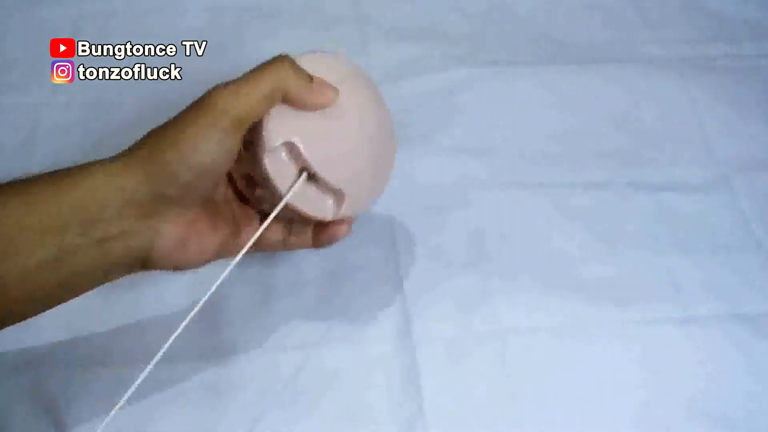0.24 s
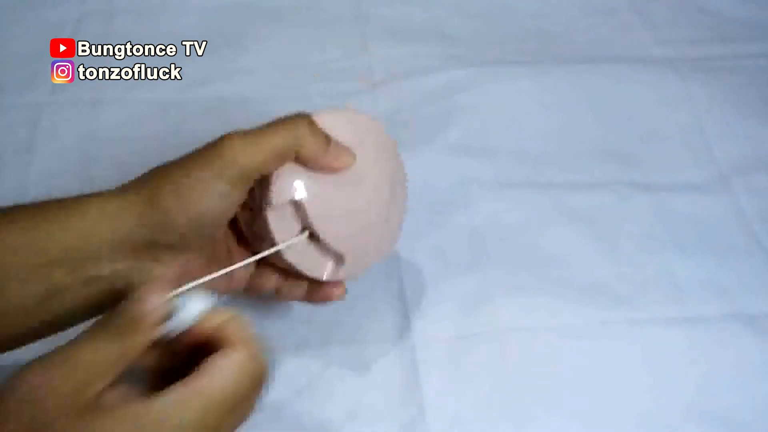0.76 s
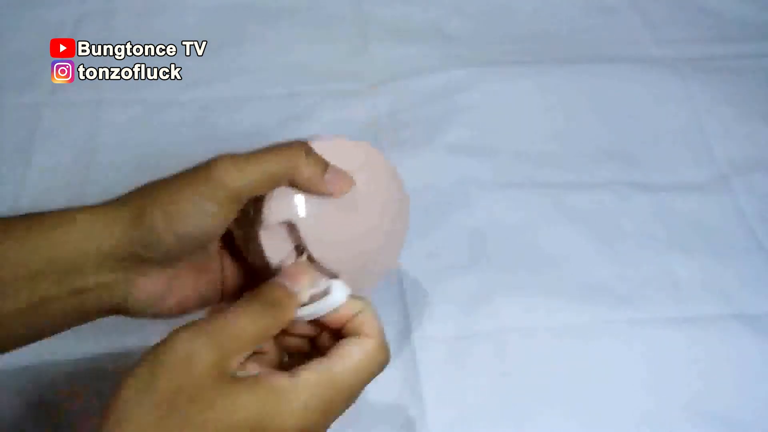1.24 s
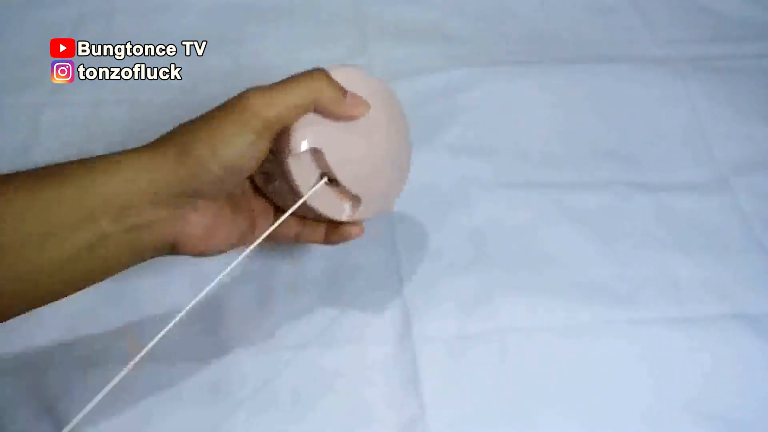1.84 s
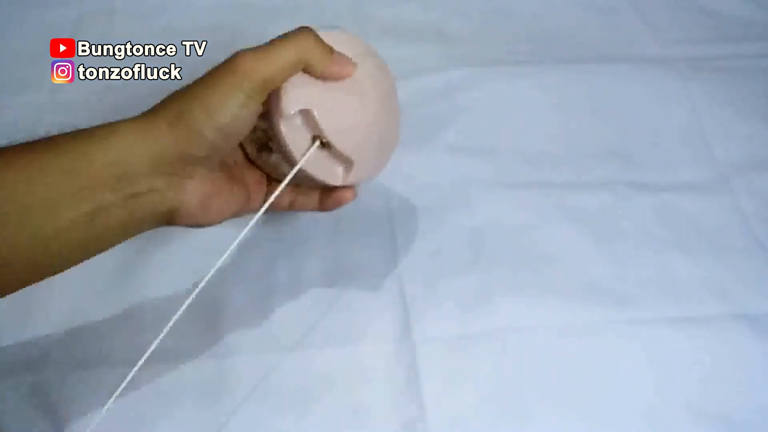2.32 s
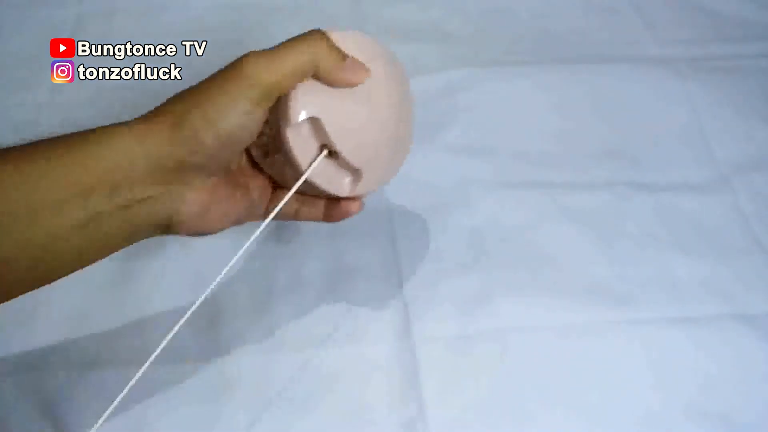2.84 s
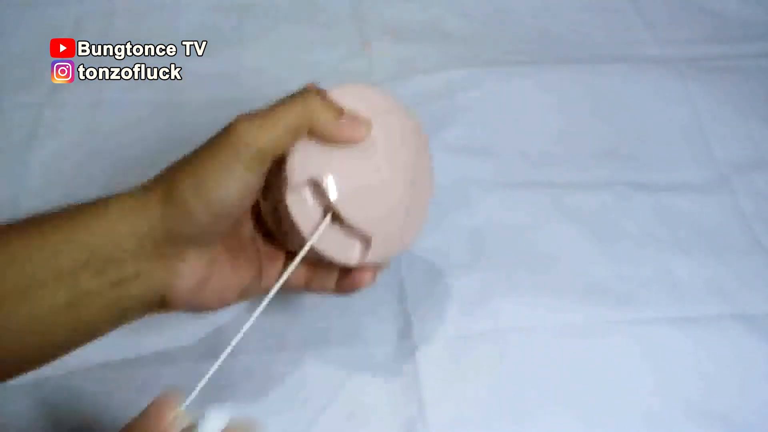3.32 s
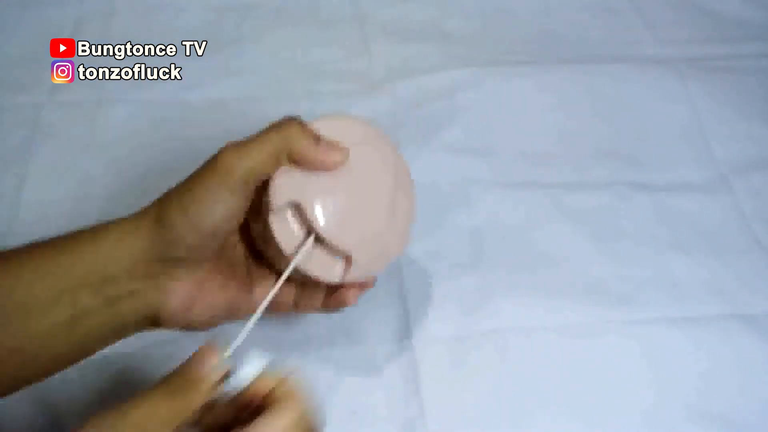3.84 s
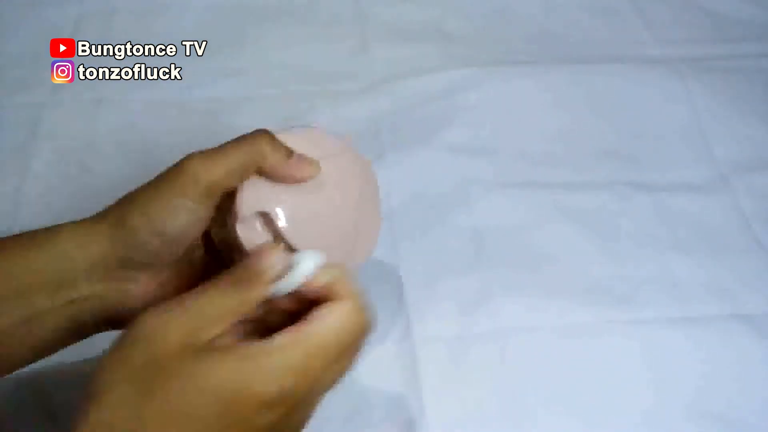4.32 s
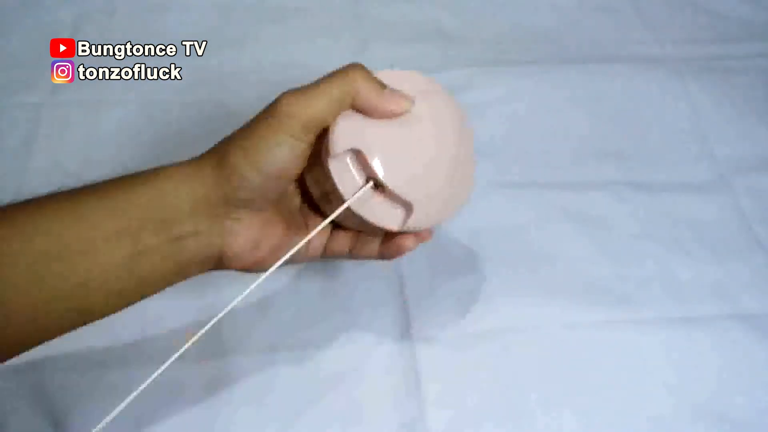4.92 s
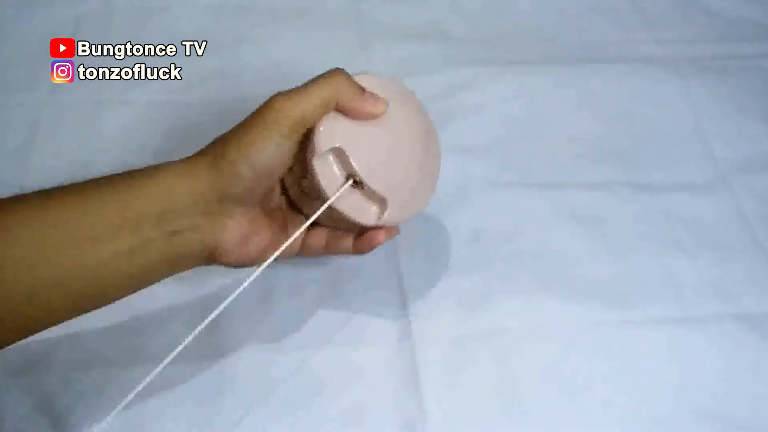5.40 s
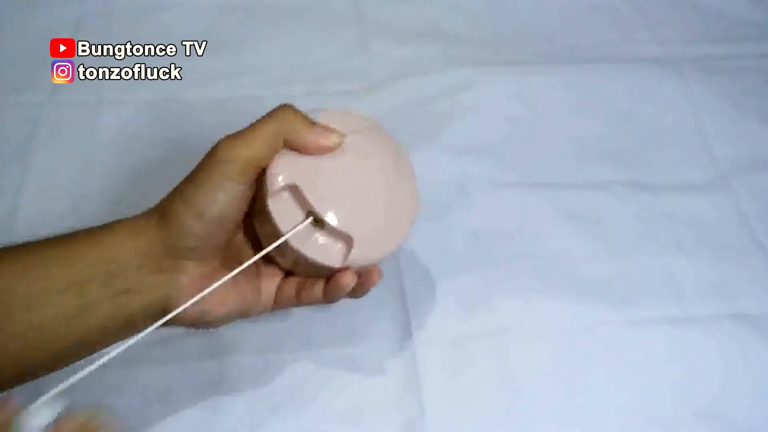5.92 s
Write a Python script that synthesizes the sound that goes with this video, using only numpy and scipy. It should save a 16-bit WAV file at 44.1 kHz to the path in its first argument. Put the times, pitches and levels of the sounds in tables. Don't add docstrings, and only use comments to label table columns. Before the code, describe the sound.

Quick, uneven mechanical strokes: a buzzing, hissing cord rewind, a tiny lull, a sharp tick as the slack ends, then a loud plastic thunk with clacks and clicks tumbling after it. About fourteen pulls occur without a long pause, all dry and close to a phone microphone. Faint low room air lies underneath, and nearby walls and table give only a brief, dull reflection.

```python
import sys
import numpy as np
from scipy import signal
from scipy.fft import rfft, irfft
from scipy.io import wavfile
from scipy.ndimage import uniform_filter1d

SR = 44100
rng = np.random.default_rng(int(sys.argv[2]) if len(sys.argv) > 2 else 0)


def ratio_of_db(decibels):
    return 10 ** (np.asarray(decibels, float) / 20)


def bounce(signal):
    frames = np.transpose(np.atleast_2d(signal))
    limited = np.clip(frames, -1, 1)
    pcm = np.round(limited * 32767).astype(np.int16)
    wavfile.write(sys.argv[1], SR, pcm)


N = 271656


def rms_one(x):
    return x / np.sqrt(np.mean(x ** 2) + 1e-20)


def drift(rate_hz):
    r = np.exp(-2 * np.pi * rate_hz / SR)
    noise = rng.standard_normal(N + SR)
    return rms_one(signal.lfilter([1], [1, -2 * r, r * r], noise)[SR:])


def resonate(x, hz, width):
    r = np.exp(-np.pi * width / SR)
    zeros = np.array([1, 0, -1]) * (1 - r * r) / 2
    poles = [1, -2 * r * np.cos(2 * np.pi * hz / SR), r * r]
    return signal.lfilter(zeros, poles, x)


def body(x, modes):
    return sum((-1) ** k * ratio_of_db(db) * resonate(x, hz, width) for k, (hz, width, db) in enumerate(modes))


def colour(x, spectrum, size=4096):
    hz, db = np.transpose(spectrum)
    grid = np.arange(1, size // 2 + 2) * SR / size
    cepstrum = irfft(np.log(ratio_of_db(np.interp(np.log(grid), np.log(hz), db))))
    cepstrum[1:size // 2] *= 2
    cepstrum[size // 2 + 1:] = 0
    response = irfft(np.exp(rfft(cepstrum)))
    return signal.fftconvolve(x, response / np.linalg.norm(response))[:N]


def along(tables, column):
    t = np.arange(N) / SR
    gain = np.zeros(N)
    for rows in tables:
        rows = np.array(rows)
        gain += ratio_of_db(np.interp(t, rows[:, 0], rows[:, column], left=-99, right=-99))
    return uniform_filter1d(gain, size=88)


# (start [s], spin-up [s], steady [s], ratchet at full speed [dB], as the hand lets up [dB])
RETURNS = [(-0.05, 0.054, 0.035, -28.5, -32.5), (0.351, 0.032, 0.074, -31.5, -34.5),
           (0.780, .044, 0.076, -27.5, -33.5), (1.212, 0.041, 0.062, -30, -30.5),
           (1.640, 0.048, 0.054, -27.5, -31.5), (2.069, 0.049, 0.042, -29, -31.5),
           (2.500, 0.027, 0.07, -32, -30.5), (2.960, .05, 0.043, -30, -31.5),
           (3.390, 0.035, 0.073, -32, -30.5), (3.840, 0.058, 0.053, -26, -27.5),
           (4.295, .035, .066, -33, -29.5), (4.729, 0.046, 0.077, -28, -36),
           (5.160, 0.027, 0.089, -28, -34), (5.581, 0.036, 0.07, -30.5, -29.5),
           (6.020, 0.072, 0.029, -28, -30.5)]
# (time [s], peak level [dB])
SNAPS = [(0.074, -17.5), (0.531, -18), (0.979, -20.5), (1.396, -22), (1.845, -14.5), (2.273, -12.5),
         (2.716, -24), (3.146, -35), (3.574, -15), (4.080, -15.5), (4.519, -20.5), (4.899, -13),
         (5.366, -40), (5.782, -17)]


def reeling():
    ratchet_start_db, ratchet_coast = -42, 200
    spool_start_db, spool_db, spool_coast = -40, -4.0, 191
    stops = [snap[0] for snap in SNAPS] + [N / SR]
    tables = []
    for (start, spin, steady, full_db, late_db), stop in zip(RETURNS, stops):
        let_up = start + spin + steady
        coast_s = stop - let_up
        tables.append([(start, ratchet_start_db, spool_start_db),
                       (start + spin, full_db, full_db + spool_db),
                       (let_up, late_db, late_db + spool_db),
                       (stop, late_db - ratchet_coast * coast_s, late_db + spool_db - spool_coast * coast_s)])
    return tables


# (frequency [Hz], level [dB per Hz])
REEL_SPECTRUM = [(1180, -39), (2000, -9), (2740, -12), (4010, -11), (5680, 0), (6640, -19), (9010, -21),
                 (12400, -32), (13900, -30), (16000, -43)]
# (frequency [Hz], level [dB per Hz])
SPOOL_SPECTRUM = [(59, -42), (100, -47.5), (308, -13), (427, -15), (733, -4), (934, -2), (3000, -19.5),
                  (3900, -43), (6600, -120)]
# (frequency [Hz], width [Hz], level [dB])
PAWL_MODES = [(4400, 75, 1.5), (5160, 130, 7), (5595, 105, 7), (8960, 1300, -56)]
# (frequency [Hz], width [Hz], level [dB])
SHELL_MODES = [(318, 96, -5.5), (542, 316, -3), (754, 34, 0), (1180, 54, 8.5), (1500, 63, -2)]


def ratchet():
    teeth_per_s = 175
    tables = reeling()
    level = along(tables, column=1)
    speed = np.clip(level / ratio_of_db(-28), 0, 1) ** .3
    teeth = np.cumsum(teeth_per_s * speed * ratio_of_db(1.5 * drift(40)) / SR)
    tooth_db = 2.5 * rng.standard_normal(N // 50)[teeth.astype(int)]
    skip = .14 + speed * ratio_of_db(tooth_db) * np.exp(-4 * (teeth % 1))
    scrape = skip * rng.standard_normal(N)
    cord = scrape + .24 * rng.standard_normal(N)
    bright = rms_one(colour(cord, REEL_SPECTRUM) + 1.7 * body(scrape, PAWL_MODES))
    wobble = rng.standard_normal(N) * ratio_of_db(3.85 * drift(145)) * (2.5 + skip)
    dull = rms_one(colour(wobble, SPOOL_SPECTRUM) + 0.19 * body(wobble, SHELL_MODES))
    return ratio_of_db(1.08) * level * bright + ratio_of_db(3.5) * along(tables, column=2) * dull


# (frequency [Hz], level [dB per Hz])
AIR_SPECTRUM = [(25, -14), (60, 9.5), (200, -1.5), (1200, -15), (5500, -14), (8000, -42), (16000, -43)]


def room_air():
    return ratio_of_db(-59) * colour(rng.standard_normal(N), AIR_SPECTRUM)


# (time [s], shell level [dB], shell pitch [Hz], bowl level [dB], gears level [dB])
BITES = [(0.152, -11.5, 1400, -2.5, -6), (0.557, -9.5, 1140, -23, -6), (1.004, -10.5, 830, -12.5, -8.5),
         (1.423, -8.5, 774, -29, -11.5), (1.865, -7, 1500, -22, -6.5), (2.295, -6.5, 1010, -5.5, -10),
         (2.762, -7, 1340, -8.5, -5), (3.180, -6.5, 1400, -8, -8), (3.698, -9, 1350, -11, -18),
         (4.101, -5.5, 1400, -22, -10.5), (4.545, -7, 878, -16, -5), (4.966, -5, 1360, -13, -3),
         (5.379, -6, 1420, -9, -5.5), (5.806, -5.5, 1256, -12.5, -4.5)]
# (stir before the bite [s], stir knock [dB], fastest after the bite [s], rumble then [dB])
PULLS = [(.022, -19, 0.076, -30.5), (.005, -22, 0.14, -31), (0.0065, -26, 0.13, -30),
         (.008, -24, 0.11, -29), (0.0045, -28, 0.079, -29.5), (0.0041, -28, 0.064, -27.5),
         (.020, -20, 0.12, -31.5), (0.0094, -22.5, 0.051, -30.5), (.016, -13, 0.035, -27),
         (.009, -23, 0.11, -27), (0.0045, -24, 0.056, -27), (0.03, -19.5, 0.12, -30),
         (0.0054, -24, 0.12, -29), (.005, -28, 0.087, -30)]


def pulling():
    slack_db, rub_fade_db = -37, 0.5
    stir_db, spent_db = -29.5, -40
    tables = []
    for snap, bite, pull, back in zip(SNAPS, BITES, PULLS, RETURNS[1:]):
        early, _, later, fastest_db = pull
        stir = bite[0] - early
        tables.append([(snap[0], slack_db), (stir, slack_db - rub_fade_db)])
        tables.append([(stir, stir_db), (bite[0] + later, fastest_db), (back[0], spent_db)])
    return tables


def grains(per_s, spread_db):
    sizes = ratio_of_db(spread_db * np.minimum(rng.exponential(1, N), 4)) * rng.choice([-1, 1], N)
    return rms_one(sizes * (rng.random(N) < per_s / SR))


def chatter_on_part():
    return (grains(1500, 4.1) + 0.57 * rng.standard_normal(N)) * ratio_of_db(2.6 * drift(82))


# (frequency [Hz], level [dB per Hz])
RUMBLE_SPECTRUM = [(18, -56), (30, -28), (426, -6), (760, 0.5), (1910, -5), (2480, -5), (2750, -11),
                   (5450, -11.5), (14000, -59), (16000, -49)]
# (frequency [Hz], width [Hz], level [dB])
BOWL_MODES = [(2216, 101, -2), (2462, 142, 1), (3350, 204, -13)]


def rotor():
    shell, bowl, gears = [chatter_on_part() for part in range(3)]
    sound = colour(gears + 0.55 * shell, RUMBLE_SPECTRUM)
    sound = sound + 3 * body(shell, SHELL_MODES) + 0.69 * resonate(gears, 3060, 590)
    sound = sound + 1.6 * body(bowl, BOWL_MODES) + .8 * resonate(bowl, 2350, 600)
    return ratio_of_db(2.5) * along(pulling(), column=1) * rms_one(sound)


def cord_snaps():
    thuds = [(s, db, 1240) for s, db in SNAPS]
    clacks = [(s, db - 31) for s, db in SNAPS]
    ticks = [(s, db - 6.5, 5440) for s, db in SNAPS]
    return thuds, clacks, ticks


# (time [s], shell level [dB], shell pitch [Hz], bowl level [dB])
TURNS = [(0.092, -15, 1600, -24), (0.196, -10.5, 685, -22), (0.220, -13, 1180, -16),
         (0.662, -12.5, 1070, -19), (0.706, -13, 1120, -16), (1.059, -13, 756, -17),
         (1.101, -16, 1520, -15), (1.138, -13, 1130, -18.5), (1.438, -14.5, 1050, -32),
         (1.487, -13, 1420, -26), (1.527, -15.5, 1380, -12.5), (1.912, -13.5, 1100, -9.5),
         (1.960, -14.5, 670, -24), (2.004, -14, 1190, -12.5), (2.386, -15.5, 1170, -19),
         (2.427, -12, 1330, -27), (2.840, -10, 564, -14), (2.884, -11.5, 1275, -7.5),
         (3.217, -12, 1230, -33), (3.256, -10.5, 1030, -28), (3.730, -16, 730, -10),
         (4.184, -9.5, 1310, -9), (4.665, -14, 1180, -23), (5.013, -13, 900, -14), (5.422, -13, 1300, -28),
         (5.454, -12, 1280, -24), (5.823, -17, 830, -19), (5.846, -9.5, 1180, -16),
         (5.887, -15, 1070, -9.5), (5.924, -13, 1340, -22.5)]


def rotor_turns():
    thuds = [(s, db, hz) for s, db, hz, _ in TURNS]
    clacks = [(s + .003, bowl_db) for s, *_, bowl_db in TURNS]
    return thuds, clacks, []


# (time [s], peak level [dB], pitch [Hz])
TICKS = [(0.093, -15.5, 5300), (0.600, -12.5, 3350), (0.692, -17, 3500), (0.735, -22, 3590),
         (1.106, -10, 3350), (1.453, -19, 3450), (1.503, -21, 3360), (1.530, -21, 4000),
         (1.581, -14.5, 3400), (1.961, -18, 4840), (2.038, -22, 3370), (2.350, -20.5, 5400),
         (2.388, -16, 5300), (2.841, -18, 4700), (2.884, -14.5, 3190), (3.259, -19.5, 4400),
         (3.605, -19.5, 3480), (3.720, -14.5, 4040), (3.734, -18, 3300), (3.764, -16, 3400),
         (4.199, -17, 3280), (4.623, -17.5, 5260), (4.652, -16.5, 3350), (5.055, -10.5, 3320),
         (5.092, -11.5, 3320), (5.465, -9.5, 3400), (5.495, -15, 3390), (5.863, -15, 3550),
         (5.874, -13.5, 4150), (5.918, -14, 3430)]


def gear_ticks():
    return [], [], TICKS


def rotor_stirs():
    stirs = [(bite[0] - pull[0], pull[1]) for bite, pull in zip(BITES, PULLS)]
    return [(s, db, 1050) for s, db in stirs], [(s, db - 2) for s, db in stirs], []


BITE_GEARS = [3400, 5700, 5400, 3470, 3480, 5800, 3500, 4950, 3320, 4700, 5300, 4620, 5170, 3580]


def clutch_bites():
    thuds = [(s, db, hz) for s, db, hz, *_ in BITES]
    rebounds = [(s + .008, db - 9.5, 730) for s, db, *_ in BITES]
    clacks = [(s + .003, bowl_db) for s, *_, bowl_db, _ in BITES]
    ticks = [(s + .0015, gears_db, hz) for (s, *_, gears_db), hz in zip(BITES, BITE_GEARS)]
    return thuds + rebounds, clacks, ticks


# (time [s], peak level [dB])
CLACKS = [(0.572, -11), (0.587, -13), (0.599, -6), (0.629, -14), (0.679, -12.5), (0.733, -13), (1.033, -16),
          (1.089, -9), (1.451, -6), (1.503, -15), (1.551, -15), (1.569, -12), (2.325, -14), (2.450, -11.5),
          (2.864, -19), (3.274, -15), (3.604, -9), (3.639, -12), (3.681, -11), (3.692, -8), (4.113, -14),
          (4.164, -8), (4.206, -6.5), (4.223, -10), (4.629, -15), (4.977, -5.5), (5.054, -6), (5.090, -8),
          (5.106, -10), (5.950, -13)]


def hub_clacks():
    count, span_s = 5, 0.16
    loudest_db, fade_db, spread_db = -19, 1.5, -1
    chatter = []
    for bite, row in zip(BITES, rng.random((len(BITES), count, 2))):
        for when, size in row:
            chatter.append((bite[0] + span_s * when, loudest_db - fade_db * when + spread_db * (2 * size - 1)))
    return [], CLACKS + chatter, []


def hits(events, contact_s, sound, size=1800):
    out = np.zeros(N + size)
    t = np.arange(size) / SR
    for (s, peak_db, *pitch), rough in zip(events, rng.standard_normal((len(events), size))):
        u = t / (contact_s * (1 + 0.5 * ratio_of_db(peak_db)))
        ring = sound(rough * u ** .25 * np.exp(-u), *pitch)
        out[round(s * SR):][:size] += ratio_of_db(peak_db) * ring / np.abs(ring).max()
    return out[:N]


def shell_ring(x, hz):
    return resonate(x, hz, 380) + .5 * body(x, SHELL_MODES)


def bowl_ring(x):
    return body(x, BOWL_MODES) + 0.56 * resonate(x, rng.uniform(2300, 2487), 187)


def gear_ring(x, hz):
    return resonate(x, hz, 310) + 0.2 * body(x, PAWL_MODES)


def hand_ring(x):
    return resonate(x, 233, 285) + 0.13 * resonate(x, 46, 60)


def bare(x, hz):
    return x


# (frequency [Hz], level [dB per Hz])
CRACK_SPECTRUM = [(300, -16), (1500, 0), (5800, -4), (6800, -18), (9500, -21), (12500, -26), (16000, -29)]


def knocks():
    causes = [cord_snaps(), rotor_turns(), gear_ticks(), rotor_stirs(), clutch_bites(), hub_clacks()]
    on_shell, on_bowl, on_gears = [sum(lists, []) for lists in zip(*causes)]
    thuds = hits(on_shell, .0015, shell_ring)
    clacks = hits(on_bowl, 0.00087, bowl_ring)
    ticks = hits(on_gears, 0.0019, gear_ring)
    crack = colour(hits(on_gears, 0.0013, bare) + 0.42 * hits(on_shell, 0.00069, bare), CRACK_SPECTRUM)
    jolts = [(s, 1.09 * db) for s, db, hz in on_shell]
    push = hits(jolts, 0.0039, hand_ring)
    soften = signal.butter(4, 6170, fs=SR, output="sos")
    plastic = signal.sosfilt(soften, thuds + clacks + ratio_of_db(-2.0) * ticks)
    return plastic + ratio_of_db(-0.5) * crack + ratio_of_db(-14.5) * push


def room(x):
    t60_s, level_db = .09, -11
    t = np.arange(SR // 4) / SR
    tail = rng.standard_normal(len(t)) * ratio_of_db(-60 * t / t60_s) * (t > .003)
    return ratio_of_db(level_db) * signal.fftconvolve(x, tail / np.linalg.norm(tail))[:N]


def scene():
    chopper = ratchet() + rotor() + knocks()
    return (chopper + room(chopper) + room_air())[None]


def low_pass(x):
    return signal.sosfilt(signal.butter(12, 16210, fs=SR, output="sos"), x)


def record(dry):
    thin = signal.sosfilt(signal.butter(2, 48, "high", fs=SR, output="sos"), dry)
    limited = .9 * np.tanh(thin / .9)
    mix = signal.sosfilt(signal.cheby2(12, 60, 16350, fs=SR, output="sos"), limited)
    return low_pass(mix)


dry = scene()
out = record(dry)
bounce(out)
```